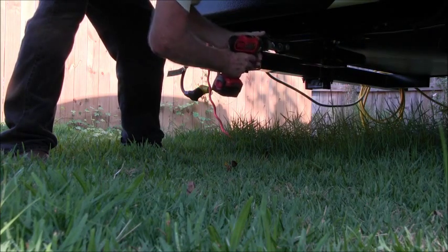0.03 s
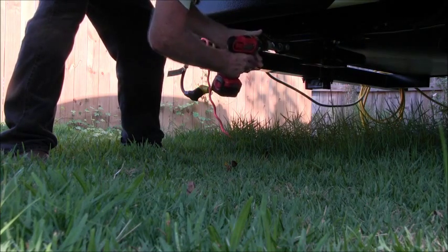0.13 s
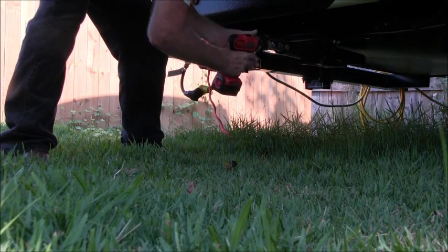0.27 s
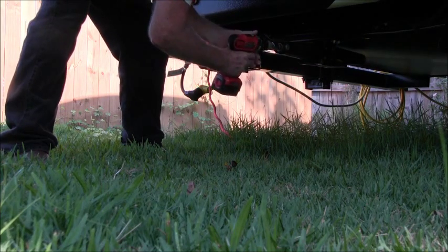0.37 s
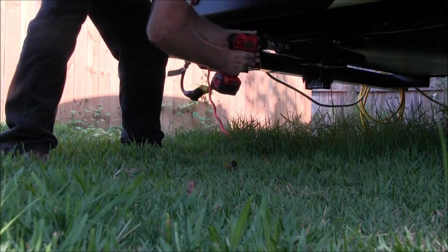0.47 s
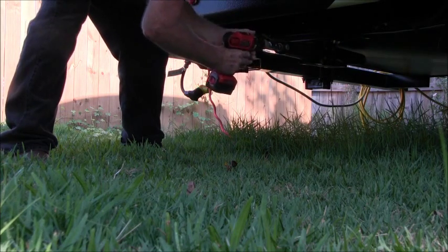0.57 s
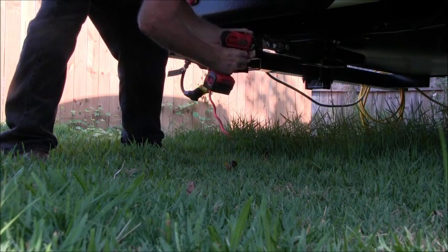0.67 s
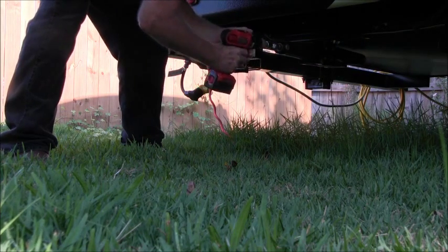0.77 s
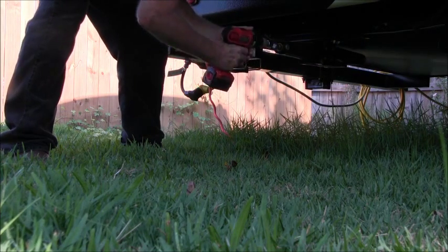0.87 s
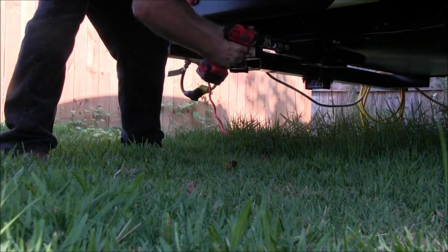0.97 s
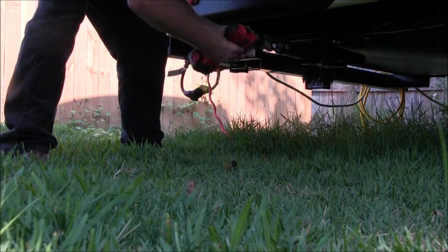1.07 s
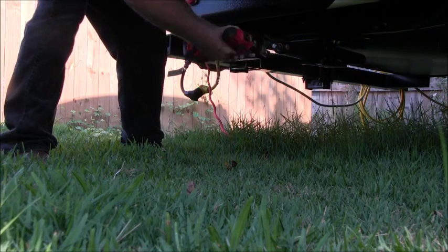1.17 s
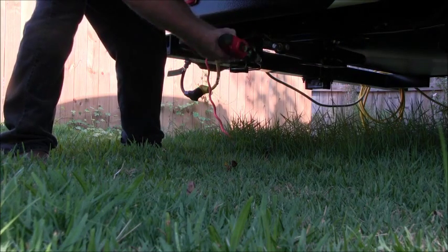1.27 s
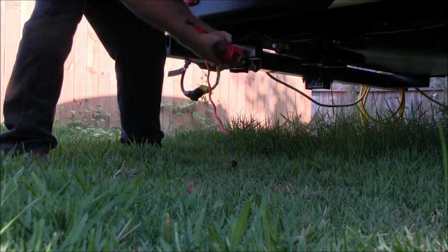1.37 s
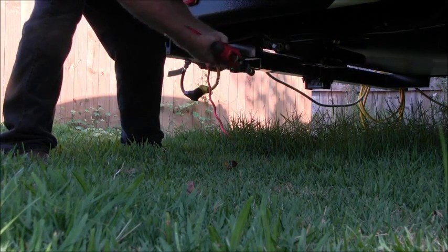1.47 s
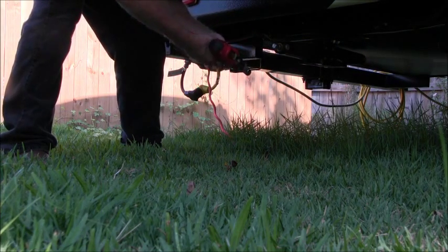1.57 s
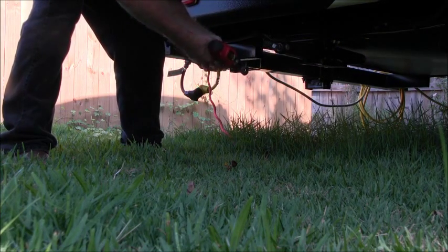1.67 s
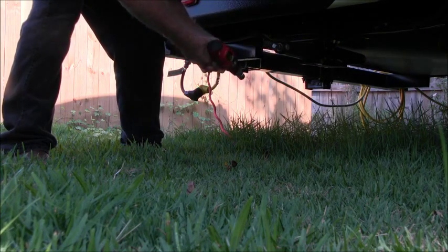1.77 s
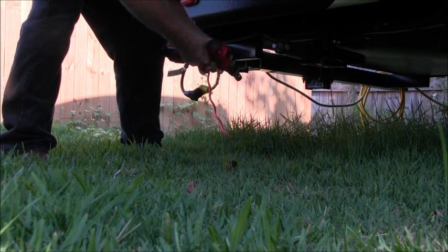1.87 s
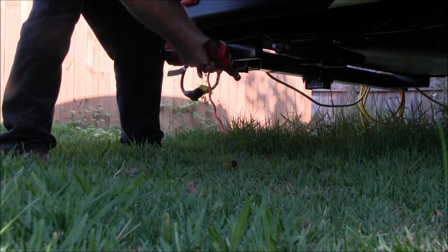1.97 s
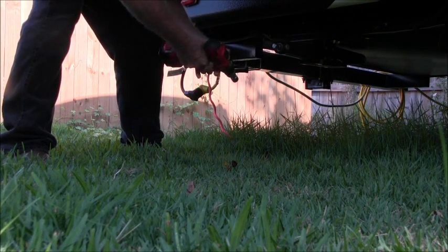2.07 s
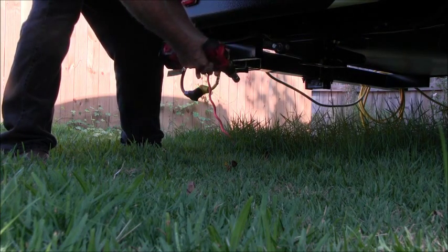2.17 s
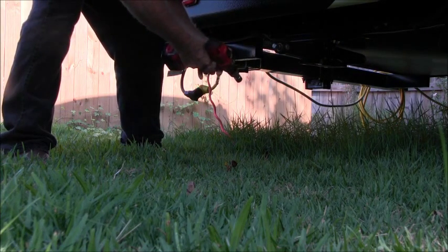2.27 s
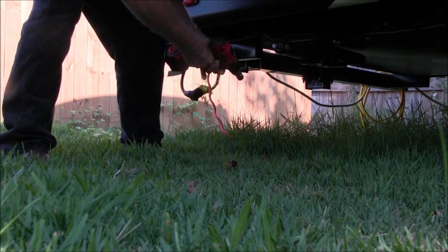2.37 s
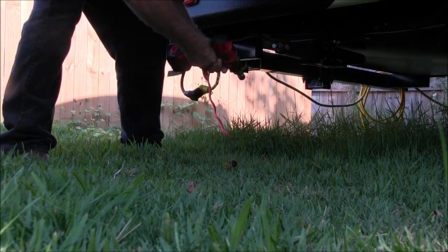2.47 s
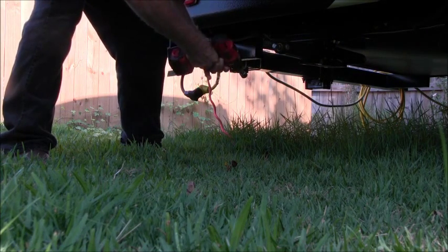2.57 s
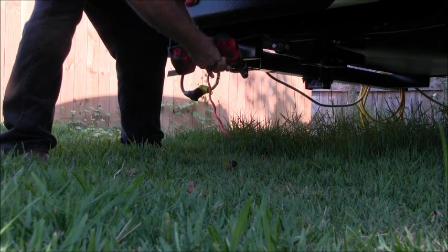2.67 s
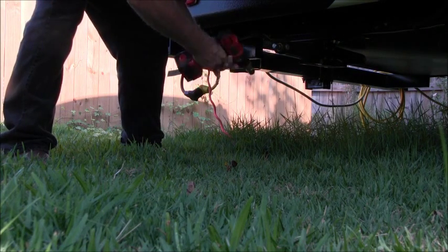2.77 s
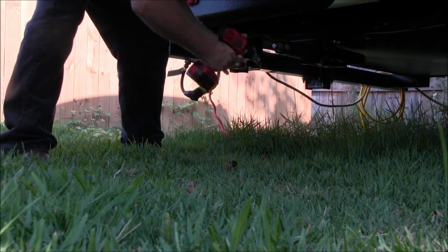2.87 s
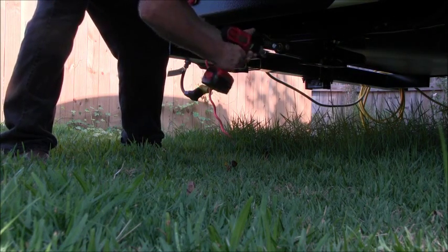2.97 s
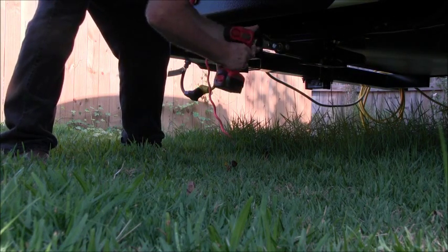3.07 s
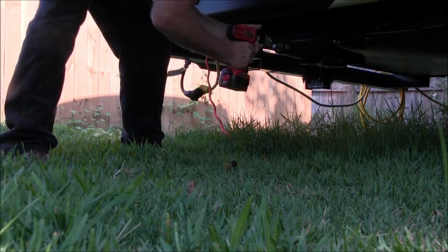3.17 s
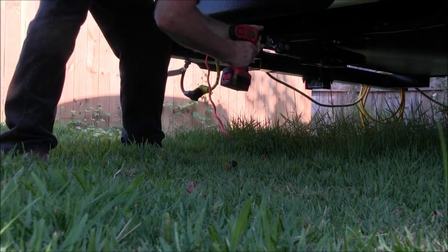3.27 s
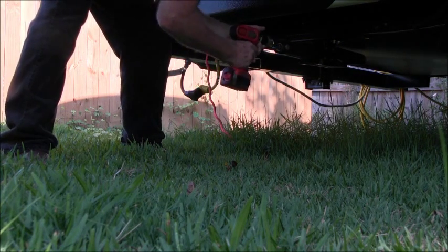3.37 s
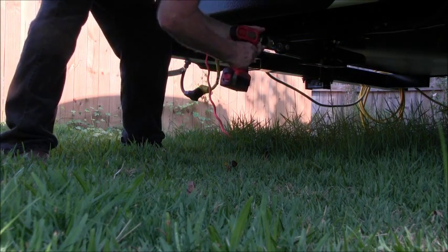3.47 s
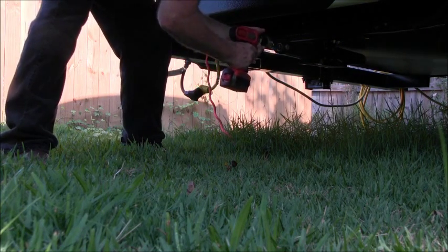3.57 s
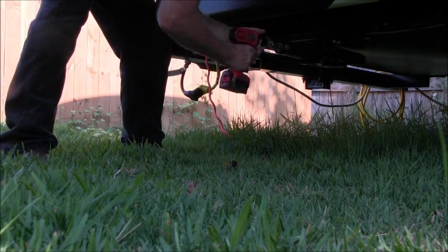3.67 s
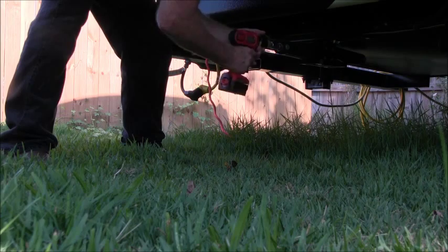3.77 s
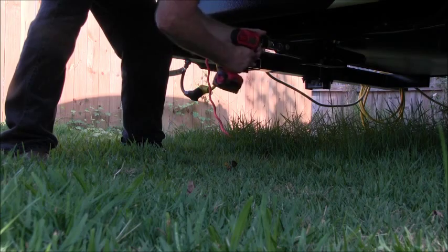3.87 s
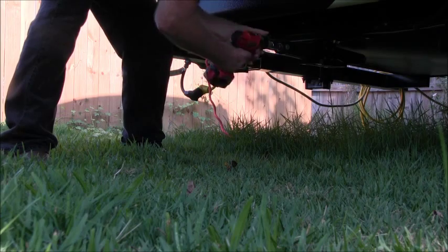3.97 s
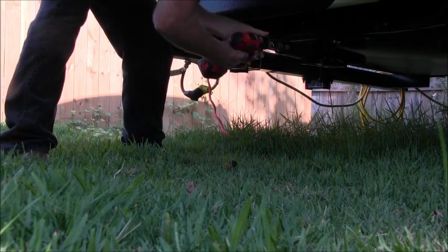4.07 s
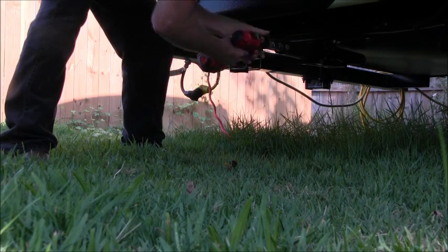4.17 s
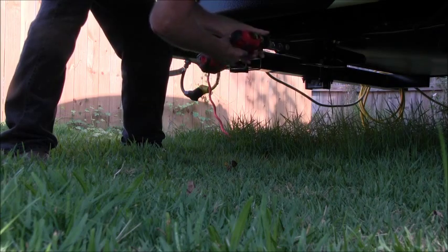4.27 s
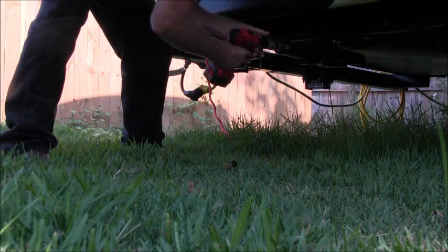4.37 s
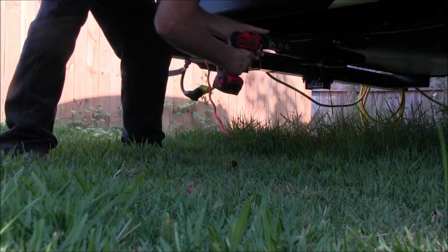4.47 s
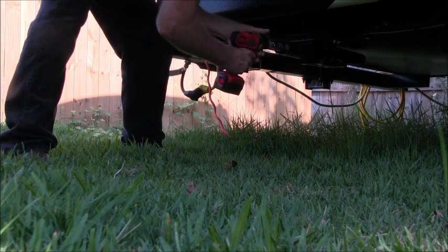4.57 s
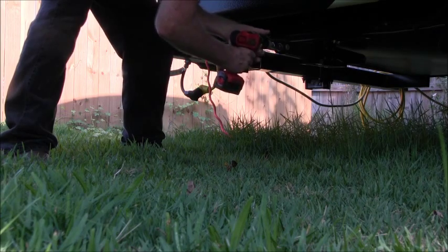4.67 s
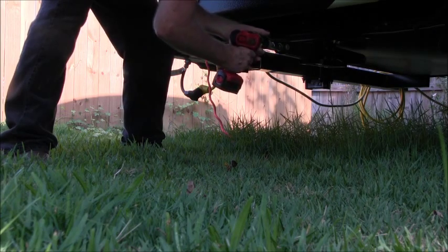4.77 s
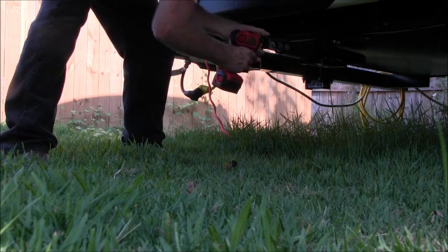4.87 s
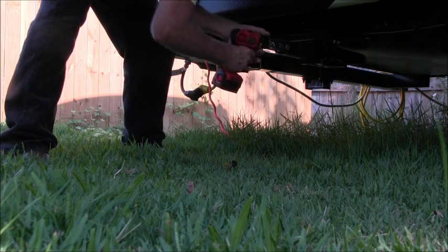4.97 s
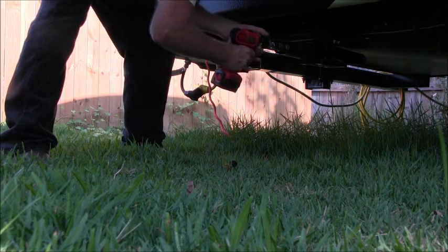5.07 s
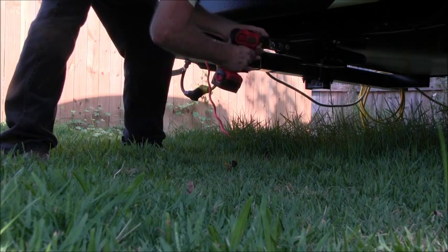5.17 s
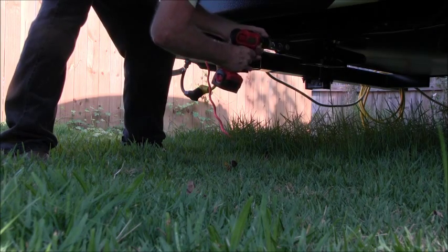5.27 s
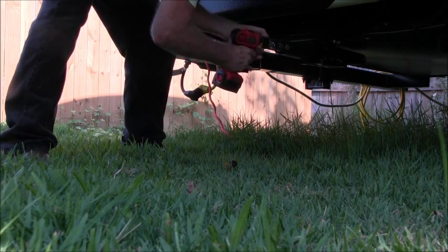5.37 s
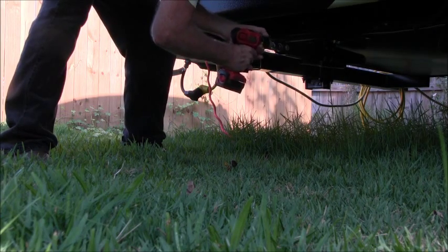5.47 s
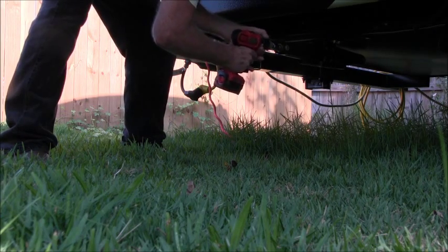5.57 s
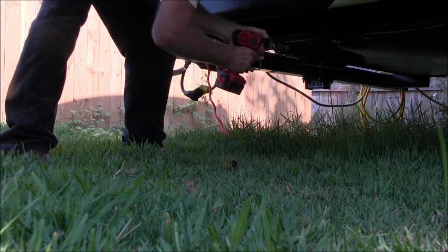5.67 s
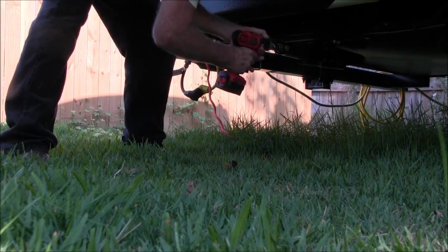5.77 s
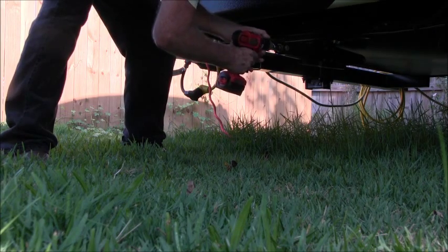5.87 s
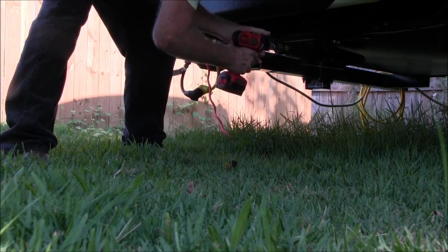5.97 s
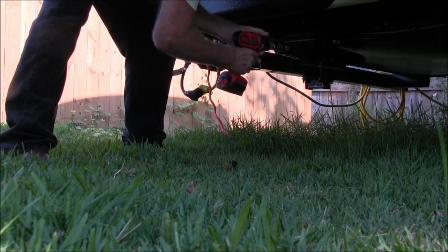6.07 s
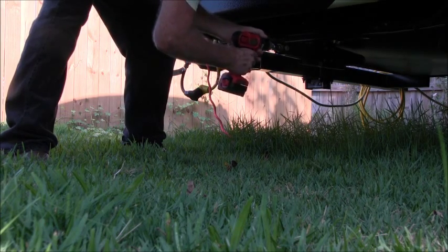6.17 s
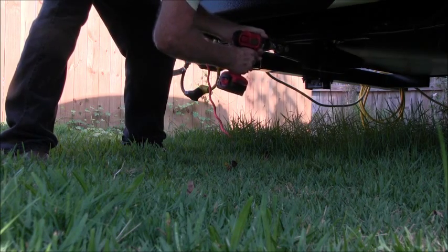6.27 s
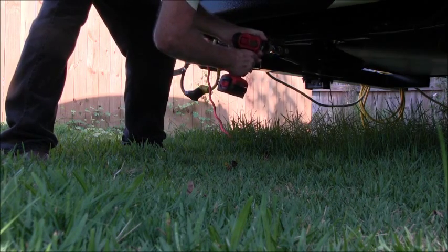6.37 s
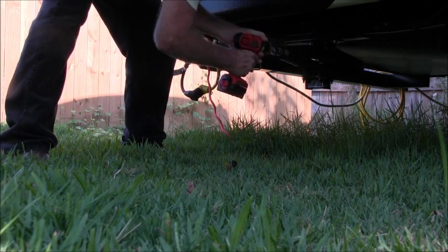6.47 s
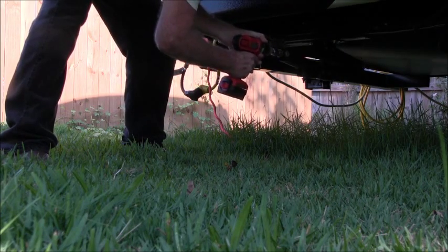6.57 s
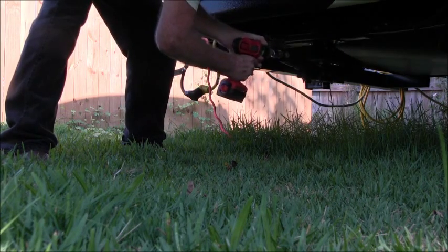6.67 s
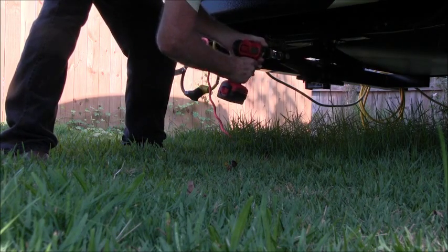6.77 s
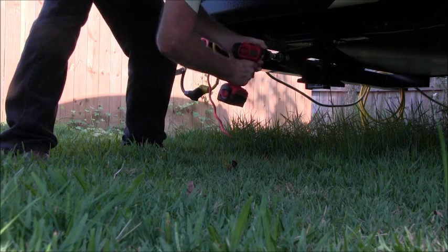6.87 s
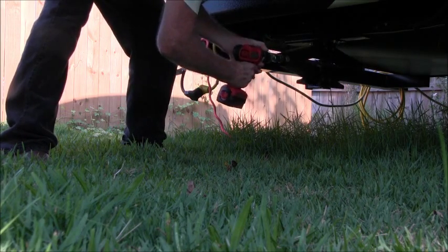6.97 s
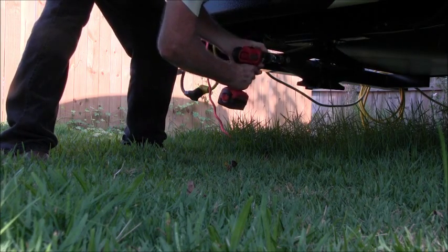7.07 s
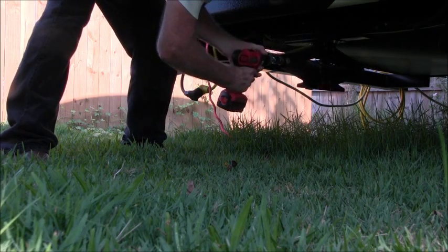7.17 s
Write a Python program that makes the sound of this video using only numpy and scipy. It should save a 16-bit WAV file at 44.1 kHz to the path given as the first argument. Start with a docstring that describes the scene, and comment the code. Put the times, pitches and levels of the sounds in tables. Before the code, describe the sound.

Quiet yard with faint birds and insect trill; metal knocks and one hard clank, then a short drill burst and a longer grinding run.

```python
"""A cordless drill winds the screw of a trailer's stabilizer jack on a lawn, a few metres from the microphone.
Gears whine and rattle, the steel frame rumbles and the loose socket knocks in one short burst and a longer run;
before that the switch snaps and the socket clanks and scrapes as it is fitted onto the jack's nut.
Behind the work: an insect's thin trill, far birds, a distant town's rumble and soft hiss.
The microphone's limiter drops the whole level under the loudest blows and lets it creep back."""
import sys
import numpy as np
from scipy import signal
from scipy.fft import rfft, irfft, next_fast_len
from scipy.io import wavfile
from scipy.ndimage import uniform_filter1d

SR = 44100
rng = np.random.default_rng(int(sys.argv[2]) if len(sys.argv) > 2 else 0)


def waveform_to_disk(signal):
    """Save audio, clipped to [-1, 1], as 16-bit WAV at the path in sys.argv[1]."""
    frames = np.transpose(np.atleast_2d(signal))
    scaled = np.clip(frames, -1, 1) * 32767
    samples = np.round(scaled).astype(np.int16)
    wavfile.write(sys.argv[1], SR, samples)


N = 318397
T = np.arange(N) / SR
RING = T[:SR // 2]  # half a second for every ringing part

# pulls of the trigger, the first only part way:
# (on [s], off [s], limit of motor speed before the screw's load [Hz])
TRIGGER_PULLS = [(5.522, 5.71, 307), (6.267, 7.3, 357)]
# the unloaded motor runs up towards its free speed and coasts down when let go
FREE_HZ, SPIN_UP_S, COAST_S = 357, .0686, .03
# the screw binds once a turn: motor turns per screw turn, where it binds [turn], share of speed lost there
GEAR_RATIO, TIGHT_SPOT, SAG = 59.6, .31, .028
# gear noise at full speed; it rises steeply with speed up to the knee
GEAR_DB, KNEE_HZ, KNEE_POWER = -22.5, 209, 3.1
# the whine is this much louder at the tight spot than opposite it
LOAD_WHINE_DB = 7
# gear mesh tones: (multiple of motor speed [ratio], relative level [dB])
MESH_TONES = [(6, -18), (10, -16), (12, 0), (24, -19), (28, -21)]
# two tones against the gear noise; load takes a further 3.5 to 10.5 dB off the whine:
# (time [s], whine level before load [dB], brush tone level [dB])
TONE_LEVELS = [(5.6, -7, -24), (6.4, -9, -26), (6.5, -3, -11), (6.74, -6.5, -12.5), (6.82, -10.5, -21),
               (7.22, -3.5, -23.5)]
# rough growl of the slower gear stage: (multiple of motor speed [ratio], relative level [dB])
SLOW_STAGE = [(2.48, 0), (5, -2), (8.3, -3), (10, -3)]
# colour of the gearbox: (frequency [Hz], relative density [dB per Hz])
GEARBOX_COLOUR = [(260, -47), (450, -14), (745, -9.5), (940, -3.5), (1090, -9), (1750, -3), (1920, -6),
                  (3400, -3), (3910, -4), (4530, -5.5), (6190, -6), (7730, -11.5), (9940, -10),
                  (11800, -18.5), (15500, -25)]
# resonances of drill and jack under load: (frequency [Hz], width [Hz], level over the gearbox colour [dB])
HOUSING_RESONANCES = [(1560, 50, -6), (1820, 34, -24), (2095, 32, 8.5), (2316, 114, 0.5), (2915, 190, 1.5),
                      (3480, 140, 0), (4270, 62, -6), (5270, 100, -18), (8670, 50, 1), (9900, 200, -25),
                      (13600, 430, -2)]
# low modes of the trailer's frame and floor: (frequency [Hz], relative level [dB], t60 [s])
FRAME_MODES = [(76.5, -9, 0.41), (130, 3.5, 0.077), (152.5, 3, 0.17), (172.5, 0, 0.28), (202.5, -0.5, 0.12),
               (256.1, -2.5, 0.18), (292.3, -7, 0.15), (347.5, -4.5, 0.13), (398.4, -11, 0.14),
               (484, -29.5, 0.52), (655, -8, 0.16), (707, -14, 0.12), (723, -13, 0.27)]
# modes of the jack's steel leg: (frequency [Hz], relative level [dB], t60 [s])
LEG_MODES = [(1141, -9, .17), (1215, -9, .22), (1400, -2, .1), (1560, -6, .1), (1803, 0, .17),
             (1906, -13, .26), (2046, -8, .3), (2234, -8, .31), (2433, -8, .19), (2692, -11, .18),
             (2885, -10, .14), (3370, -16, .2), (4296, -22, .2), (5615, -7, .1), (6142, -9, .1)]
# modes of the socket on its shank: (frequency [Hz], relative level [dB], t60 [s])
SOCKET_MODES = [(1920, -13, .12), (2220, -7, 0.3), (2410, 0.5, 0.037), (2640, -22, 0.12), (2637, 2, 0.12),
                (2780, -8, 0.2), (2810, -7, 0.2), (3080, -5, 0.097), (3493, -5, 0.086), (4390, -10, 0.082)]
# colour of the dense steel clatter: (frequency [Hz], relative density [dB per Hz])
STEEL_COLOUR = [(180, 2), (300, -1), (685, -7), (937, -5), (1350, 5), (1670, 1.5), (2280, 1.5),
                (4210, -2.5), (6150, -1.5), (12500, -21.5), (14000, -21), (15500, -79)]
# how long the clatter lasts: (frequency [Hz], t60 [s])
STEEL_DECAY = [(300, 0.32), (1500, 0.12), (3000, 0.094), (6000, 0.062), (12000, 0.055)]
# the loose socket flops over twice in each turn of the screw; levels at the motor's free speed:
# (place in the turn [turn], clatter [dB], frame thud [dB], socket ring [dB], dullness, cut at 1.33 times it [Hz])
SOCKET_FLOPS = [(.05, -28, -22, -32, 4000), (.522, -22.5, -18.5, -30, 4400)]
# blows of the socket while it is fitted, and jolts as the screw starts and stops:
# (time [s], clatter [dB], frame thud [dB], socket ring [dB], dullness, cut at 1.33 times it [Hz])
FITTING_BLOWS = [(0.661, -48, -31, -51.5, 4000), (.692, -43.5, -36, -49, 8000),
                 (3.585, -27, -27, -24, 6600), (3.682, -40, -43, -38, 4000), (3.694, -31, -29.5, -29, 6000),
                 (3.728, -41.5, -31.5, -61, 2980), (3.869, -57, -37.5, -68, 2000),
                 (4.003, -49.5, -39, -54, 7000), (4.149, -45.5, -28, -47.5, 2470),
                 (4.232, -64, -31.5, -65, 2000), (4.283, -41.5, -26.5, -43, 5000),
                 (4.308, -33, -56, -37, 9000), (4.32, -12, -13, -29, 9450), (4.372, -43, -23.5, -53, 2500),
                 (4.505, -39.5, -34, -47, 5960), (5.587, -30, -17, -47, 4000),
                 (5.728, -35.5, -27.5, -58, 1300), (6.2978, -32.5, -53, -35, 3480)]
# every blow rings the leg (against its clatter) and bounces once (against the first contact)
LEG_DB, BOUNCE_S, BOUNCE_DB = -7, .011, -6.5
# switch snaps and handling ticks: (time [s], level [dB], thin below [Hz], dull above [Hz])
SWITCH_SNAPS = [(1.467, -53.5, 5000, 15000), (1.755, -40.5, 1260, 3060), (2.0655, -19, 610, 13900),
                (2.217, -32.5, 300, 15000), (2.97, -44.5, 1410, 3500), (5.335, -57, 6000, 13900),
                (5.413, -50.5, 6000, 15000), (5.524, -44.5, 1940, 15000), (6.266, -50.5, 1985, 15000)]
# colour of the drill's plastic shell: (frequency [Hz], relative density [dB per Hz])
SHELL_COLOUR = [(120, -48), (200, -26), (414, -24), (850, -12.5), (1400, -8), (2200, -2), (3070, -4),
                (3900, -2.5), (5200, 3), (6500, -7), (7300, -3.5), (9700, -18), (13600, -21), (15500, -20)]
# how long the shell sounds: (frequency [Hz], t60 [s])
SHELL_DECAY = [(500, 0.1), (2000, 0.053), (6000, 0.014), (12000, 0.031)]
# each snap is followed by a second as the part seats
SEAT_S, SEAT_DB = .008, -0.5
# left-right difference added by ground and grass: (frequency [Hz], side level against the work [dB])
GROUND_SPREAD = [(30, -15), (100, -79), (250, -15), (1000, -19), (4000, -16.5), (12000, -14.5)]
# the insect's trill starts here and grows slowly louder and higher
INSECT_HZ, INSECT_RISE_HZ_PER_S, INSECT_DB, INSECT_SWELL_DB_PER_S = 9340, 42, -69.5, 1.49
# far bird calls: (time [s], length [s], start [Hz], middle [Hz], end [Hz], level [dB])
BIRD_CALLS = [(0, 0.052, 4100, 3910, 3400, -60.5), (0.403, 0.17, 5100, 4500, 4040, -63.5),
              (2.009, 0.26, 6900, 7800, 7900, -54.5), (2.62, 0.097, 6500, 6840, 7300, -74),
              (2.79, .09, 7100, 6960, 6900, -65), (3.386, 0.34, 1550, 1460, 1430, -59),
              (5.935, 0.39, 1730, 1680, 1740, -61.5)]
# colour of the outdoor air: (frequency [Hz], relative density [dB per Hz])
AIR_COLOUR = [(15, -46), (25, -16), (113, 0), (148, -4), (240, -10.5), (378, -16.5), (703, -20.5),
              (826, -22), (1340, -21), (1530, -23.5), (2770, -26), (8130, -32.5), (9300, -30),
              (10100, -33.5), (15500, -39.5)]
# width of the outdoor air: (frequency [Hz], side level against the middle [dB])
AIR_WIDTH = [(60, -20), (110, -15), (200, -6), (380, 1), (700, 0.5), (1290, -4.5), (2380, -5), (4400, -5.5),
             (8120, -6), (15000, -5)]
# mean level of the air's middle signal
AIR_DB = -48
# limiter: ceiling of the short-term level, time it averages over, speed at which the gain comes back
CEILING_DB, DETECT_S, RECOVER_DB_PER_S = -18.5, .002, 1.47
TOP_HZ = 15800  # upper limit of the recorder


def undb(db):
    """Decibels to gain."""
    return 10 ** (np.asarray(db) / 20)


def unit(x):
    """Scale to rms 1."""
    return x / np.sqrt(np.mean(x ** 2))


def curve(rows, axis=1):
    """One column of a table, joined by straight lines in time."""
    rows = np.array(rows)
    return np.interp(T, rows[:, 0], rows[:, axis])


def at_hz(points, hz):
    """Read (frequency [Hz], value) points on a log-frequency axis."""
    points = np.array(points)
    return np.interp(np.log(hz + 1e-3), np.log(points[:, 0]), points[:, 1])


def shape(x, gain):
    """Filter by a gain that is a function of frequency."""
    size = next_fast_len(len(x))
    hz = np.arange(size // 2 + 1) * SR / size + 1e-3
    return irfft(rfft(x, size) * gain(hz), size)[:len(x)]


def resonance(f, hz, width):
    """Response of one resonance, 1 at its centre."""
    return 1 / (1 + 1j * (f * f - hz * hz) / (f * width))


def edge(x, hz, kind, order=2):
    """Butterworth low-pass or high-pass."""
    return signal.sosfilt(signal.butter(order, hz, kind, fs=SR, output="sos"), x)


def walk(rate):
    """Smooth chance with spread 1, changing about rate times a second."""
    size = max(int(SR / rate), 1)
    steps = np.repeat(rng.standard_normal(N // size + 1), size)
    return unit(uniform_filter1d(steps, size)[:N])


def add(out, s, x):
    """Mix x into out from time s on."""
    i = max(int(s * SR), 0)
    out[i:i + len(x)] += x[:max(N - i, 0)]


def blow(x):
    """Scale a decaying sound to rms 1 over its first hundredth of a second."""
    return x / np.sqrt(np.mean(x[:SR // 100] ** 2))


def decay(t60):
    """Exponential fade by 60 dB in t60 seconds."""
    return np.exp(-np.log(1000) * RING / t60)


def modes(table):
    """Each mode's decaying sine, one a row."""
    hz, db, t60 = np.array(table).T[:, :, None]
    return undb(db) * decay(t60) * np.sin(2 * np.pi * hz * RING)


def strike(rows):
    """Every blow lands elsewhere and weights the modes anew."""
    weights = rng.choice([-1, 1], len(rows)) * undb(1.5 * rng.standard_normal(len(rows)))
    return weights @ rows / np.sqrt(np.sum(np.mean(rows[:, :SR // 100] ** 2, axis=1)))


def loose(x):
    """A part that sits loosely chatters while it rings, which smears its tones."""
    return x * (1 + .35 * walk(200)[:len(x)] + .35 * walk(800)[:len(x)])


def clatter(colour, t60s):
    """Countless short modes: noise whose bands die away each at its own rate."""
    noise = shape(rng.standard_normal(len(RING)), lambda f: undb(at_hz(colour, f)))
    centres = np.array(t60s)[:, 0]
    out = 0
    # overlapping bands, each full at its own centre and gone at its neighbours'
    for (_, t60), share in zip(t60s, np.eye(len(t60s))):
        band = shape(noise, lambda f: at_hz(np.c_[centres, share], f))
        out = out + band * decay(t60)
    return blow(out)


def motor():
    """Speed the trigger asks for (Hz) and the angle of the screw that follows from it (turns)."""
    hz = np.zeros(N)
    for on, off, limit_hz in TRIGGER_PULLS:
        run_up = FREE_HZ * (1 - np.exp(-(np.clip(T, on, off) - on) / SPIN_UP_S))
        hz += np.minimum(run_up, limit_hz) * np.exp(-np.maximum(T - off, 0) / COAST_S)
    return hz, np.cumsum(hz) / SR / GEAR_RATIO


def housing(f):
    """Gain of the gearbox colour with the resonances of drill and jack on top."""
    peaks = sum(undb(db) * abs(resonance(f, hz, width)) ** 2 for hz, width, db in HOUSING_RESONANCES)
    return undb(at_hz(GEARBOX_COLOUR, f)) * (1 + peaks)


def drill(tooth_scatter_db=3.0, growl_db=-12.5, growl_blur=0.32, rumble_db=-1, rumble_top_hz=470,
          flutter=.005, dull_hz=3000):
    """Gear teeth rattle the housing and sing at multiples of the motor speed; the screw shakes the frame."""
    free_hz, screw = motor()
    load = .5 + .5 * np.cos(2 * np.pi * (screw - TIGHT_SPOT))
    hz = free_hz * (1 - SAG * load)
    drive = undb(GEAR_DB) * np.tanh((hz / KNEE_HZ) ** KNEE_POWER)
    turns = np.cumsum(hz * (1 + flutter * walk(150))) / SR

    # four uneven tooth impacts a turn, each a fading scrape
    teeth = 4 * turns
    tooth_gain = undb(tooth_scatter_db * rng.standard_normal(N // 4))
    force = tooth_gain[teeth.astype(int)] * np.exp(-(teeth % 1) / 1.73)
    rattle = unit(force * rng.standard_normal(N) * undb(1.8 * walk(70)))
    # above the rattle, fan and brushes hiss evenly
    hiss = edge(rng.standard_normal(N), 5500, "high")
    gears = unit(shape(edge(rattle, 5500, "low") + hiss, housing))
    # slow teeth meet softly, so the treble grows with speed
    pace = hz / hz.max()
    dull = shape(gears, lambda f: 1 / (1 + (f / dull_hz) ** 4))
    gears = dull + pace ** 0.85 * (gears - dull)

    whine = unit(sum(undb(db + 2.8 * walk(45) + 1.5 * walk(250)) * np.sin(2 * np.pi * k * turns)
                     for k, db in MESH_TONES))
    brush = unit(undb(3 * walk(50)) * np.sin(2 * np.pi * 14.96 * turns + .7 * walk(120)))
    whine_db = curve(TONE_LEVELS) + LOAD_WHINE_DB * (load - 1.5)
    tones = undb(whine_db) * whine + undb(curve(TONE_LEVELS, axis=2)) * brush
    # backlash lets the slower stage slip back and forth, smearing its tones
    growl = unit(sum(undb(db + 4.0 * walk(90)) * np.sin(2 * np.pi * (k * turns + growl_blur * walk(90)))
                     for k, db in SLOW_STAGE))

    # the frame goes on humming after the motor stops
    frame = edge(modes(FRAME_MODES).sum(axis=0), rumble_top_hz, "low", order=4)
    shaking = drive * edge(rattle, 123, "high")
    rumble = signal.fftconvolve(shaking, frame / np.linalg.norm(frame))[:N]
    return drive * (gears + tones + undb(growl_db) * growl) + undb(rumble_db) * rumble


def flops(scatter_db=1.5):
    """The socket's blows as the screw turns, harder the faster it goes, as rows like FITTING_BLOWS."""
    hz, screw = motor()
    rows = []
    for turn in range(int(screw[-1]) + 1):
        for share, *levels_db, dull_hz in SOCKET_FLOPS:
            i = np.searchsorted(screw, turn + share)
            if i < N:
                force_db = 20 * np.log10(hz[i] / FREE_HZ + 1e-6) + scatter_db * rng.standard_normal()
                rows.append((i / SR, *(np.array(levels_db) + force_db), dull_hz))
    return rows


def knocks(thud_lag_s=0.0076):
    """The socket hits and bounces: steel clatters, leg and socket ring, the frame's thud swells more slowly."""
    out = np.zeros(N)
    frame, leg, socket = modes(FRAME_MODES), modes(LEG_MODES), modes(SOCKET_MODES)
    contact = 1 - np.exp(-RING / .001)
    for s, clank_db, thud_db, socket_db, dull_hz in [*FITTING_BLOWS, *flops()]:
        for lag_s, db in (0, 0), (BOUNCE_S, BOUNCE_DB):
            clank = blow(edge(clatter(STEEL_COLOUR, STEEL_DECAY), 1.33 * dull_hz, "low"))
            steel = undb(clank_db) * (clank + undb(LEG_DB) * loose(strike(leg)))
            steel = steel + undb(socket_db) * loose(strike(socket))
            add(out, s + lag_s, undb(db) * steel * contact)
        thud = strike(frame) * (1 - np.exp(-RING / thud_lag_s))
        add(out, s, undb(thud_db) * thud)
    return out


def rubbing(start_s=3.72, stop_s=4.68, fade_s=0.043, scrape_db=-57.0, rumble_db=-44, low_hz=500, high_hz=5200):
    """The socket is worked onto the nut: a soft uneven scrape that also sets the frame rumbling."""
    touch = np.clip(np.minimum(T - start_s, stop_s - T) / fade_s, 0, 1)
    friction = undb(2 * walk(25)) * rng.standard_normal(N)
    scrape = unit(edge(edge(friction, low_hz, "high"), high_hz, "low"))
    frame = modes(FRAME_MODES).sum(axis=0)
    rumble = unit(signal.fftconvolve(edge(friction, low_hz, "low"), frame)[:N])
    return touch * (undb(scrape_db) * scrape + undb(rumble_db) * rumble)


def clicks():
    """Dry double snaps of the drill's switch and plastic shell, as short bursts of damped noise."""
    out = np.zeros(N)
    for s, db, thin_hz, dull_hz in SWITCH_SNAPS:
        for lag_s, seat_db in (0, 0), (SEAT_S, SEAT_DB):
            snap = edge(clatter(SHELL_COLOUR, SHELL_DECAY), thin_hz, "high")
            snap = edge(snap, dull_hz, "low", order=3)
            add(out, s + lag_s, undb(db + seat_db) * blow(snap))
    return out


def widen(x, lag_s=0.001005):
    """An early reflection from one side colours left and right differently."""
    side = shape(x, lambda f: undb(at_hz(GROUND_SPREAD, f)) * np.exp(-2j * np.pi * f * lag_s))
    return side * np.array([[1], [-1]])


def yard(x, near_db=-14, near_t60=0.14, far_db=-27, far_t60=0.42):
    """Quick scatter under the trailer and a faint tail from the fence, different on each side."""
    near = undb(near_db - 60 * RING / near_t60) / np.sqrt(near_t60)
    far = undb(far_db - 60 * RING / far_t60) / np.sqrt(far_t60)
    # the last factor gives each tail the energy its level names
    tails = edge(rng.standard_normal((2, len(RING))), 19845, "low", order=1)
    tails = tails * (near + far) * np.sqrt(2 * np.log(1000) / SR)
    return x + signal.fftconvolve(x[None], tails, axes=1)[:, :N]


def insect(stroke_hz=69, depth=0.13, width_hz=150):
    """Wing strokes excite one narrow, very high resonance."""
    rasp = unit(shape(rng.standard_normal(N), lambda f: 1 / (1 + (f / width_hz) ** 1.56)))
    strokes = 1 + depth * np.sin(2 * np.pi * stroke_hz * T)
    hz = INSECT_HZ + INSECT_RISE_HZ_PER_S * T + 60 * walk(200)
    trill = unit(rasp * strokes * np.sin(2 * np.pi * np.cumsum(hz) / SR))
    return undb(INSECT_DB + INSECT_SWELL_DB_PER_S * T) * trill


def birds():
    """Thin gliding whistles, smeared by many echoes among the trees."""
    out = np.zeros(N)
    for s, length, start_hz, middle_hz, end_hz, db in BIRD_CALLS:
        u = np.linspace(0, 1, int(length * SR))
        glide = np.polyfit([0, .5, 1], [start_hz, middle_hz, end_hz], 2)
        whistle = np.sin(2 * np.pi * np.cumsum(np.polyval(glide, u)) / SR)
        smear = .7 + unit(edge(rng.standard_normal(len(u)), .04 * middle_hz, "low"))
        add(out, s, undb(db) * unit(np.sqrt(u * (1 - u)) * smear * whistle))
    return out


def air():
    """Distant town rumble and soft hiss: shaped noise, with separate noise for the stereo width."""
    mid, side = (unit(shape(rng.standard_normal(N), lambda f: undb(at_hz(AIR_COLOUR, f)))) for _ in range(2))
    side = shape(side, lambda f: undb(at_hz(AIR_WIDTH, f)))
    return undb(AIR_DB + .5 * walk(5.3)) * (mid + side * np.array([[1], [-1]]))


def limiter(x):
    """The gain drops at once under a loud blow and creeps back over seconds."""
    power = uniform_filter1d(np.mean(x ** 2, axis=0), max(int(DETECT_S * SR), 1))
    over_db = np.maximum(10 * np.log10(power + 1e-12) - CEILING_DB, 0)
    recovery_db = RECOVER_DB_PER_S * T
    cut_db = np.maximum.accumulate(over_db + recovery_db) - recovery_db
    return x * undb(-cut_db)


def scene(pan_db=-1.0):
    """Work, birds and insect stand slightly right of the microphone's axis, in open air."""
    work = edge(drill() + knocks() + clicks() + rubbing(), 85, "high")
    placed = yard(work + birds() + insect()) + widen(work)
    return placed * undb(np.array([[pan_db], [-pan_db]]) / 2) + air()


def record(dry):
    """The microphone's limiter holds down the loudest blows; a steep low-pass cuts the top."""
    return signal.sosfilt(signal.ellip(10, .2, 70, TOP_HZ, fs=SR, output="sos"), limiter(dry))


dry = scene()
out = record(dry)
waveform_to_disk(out)
```